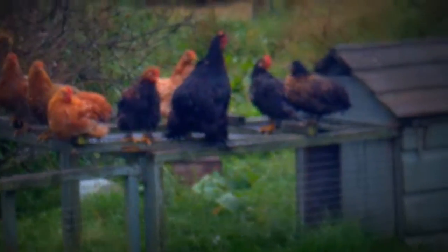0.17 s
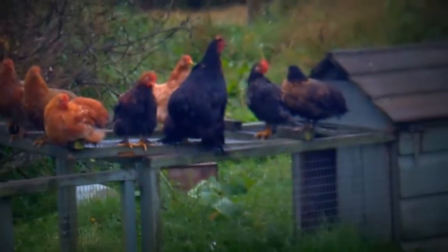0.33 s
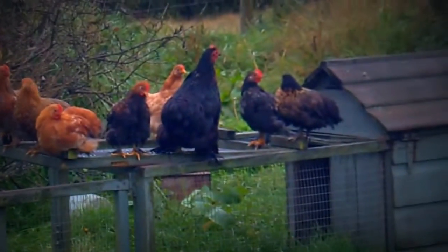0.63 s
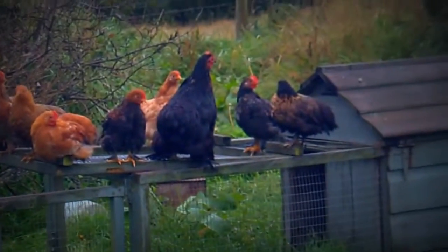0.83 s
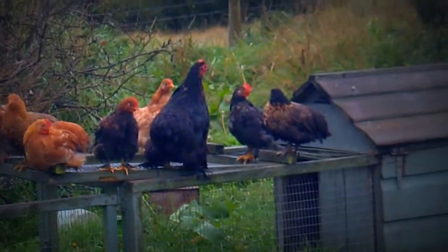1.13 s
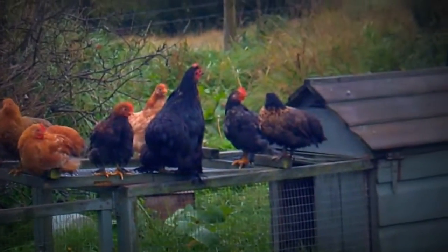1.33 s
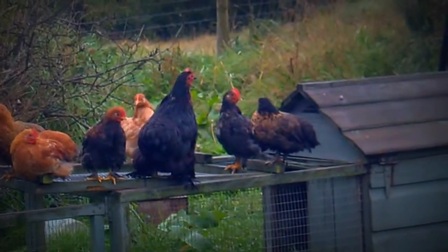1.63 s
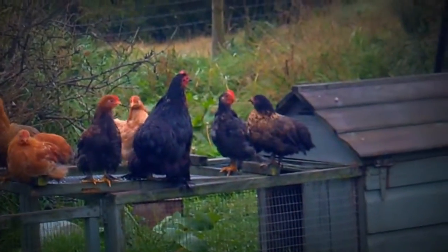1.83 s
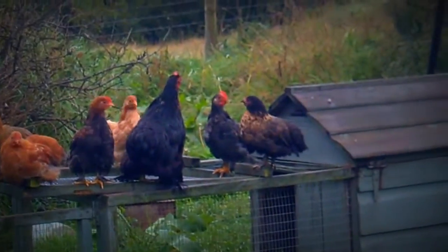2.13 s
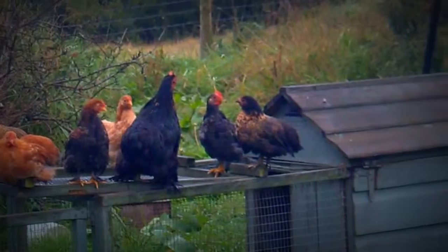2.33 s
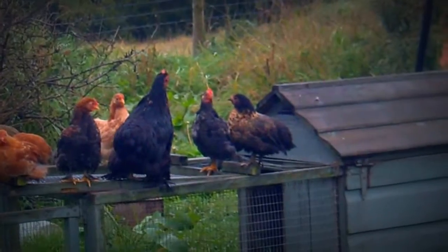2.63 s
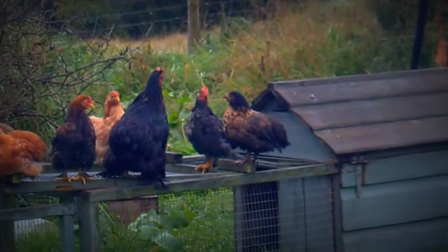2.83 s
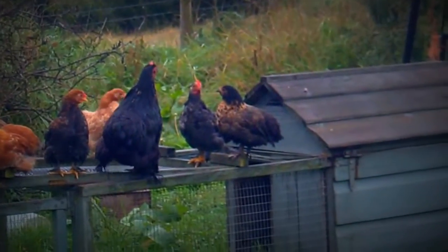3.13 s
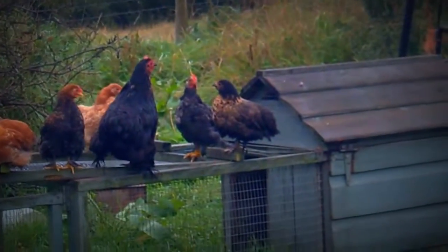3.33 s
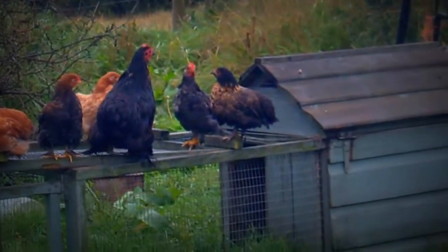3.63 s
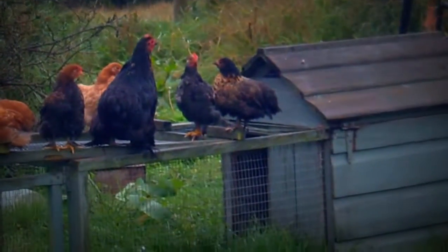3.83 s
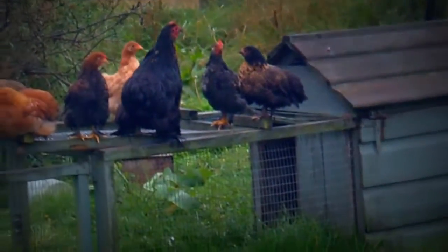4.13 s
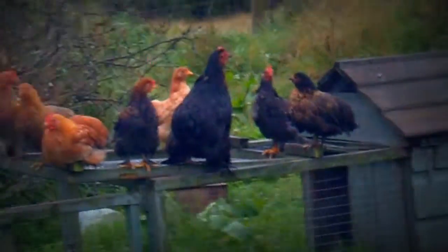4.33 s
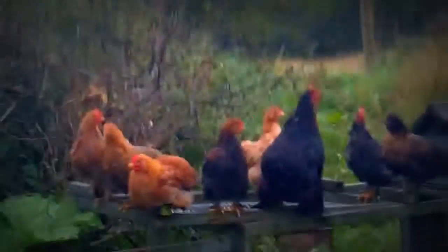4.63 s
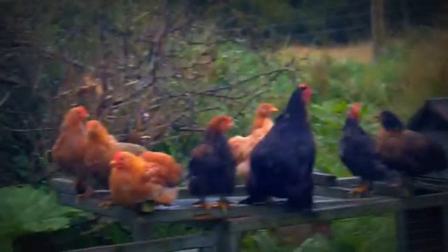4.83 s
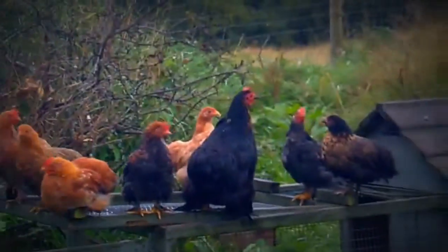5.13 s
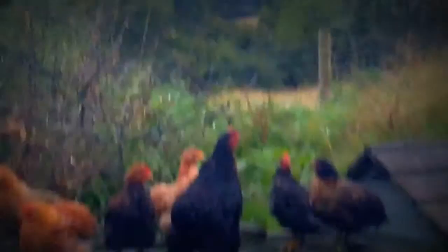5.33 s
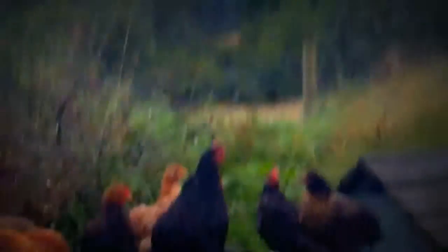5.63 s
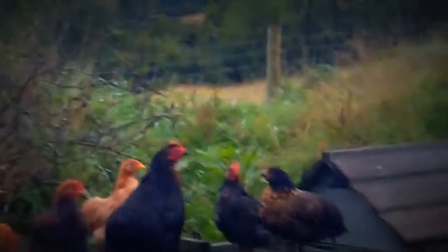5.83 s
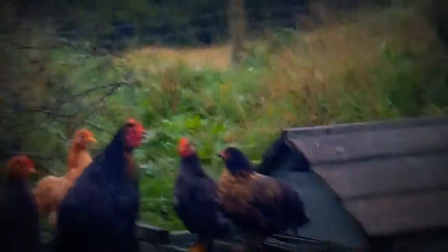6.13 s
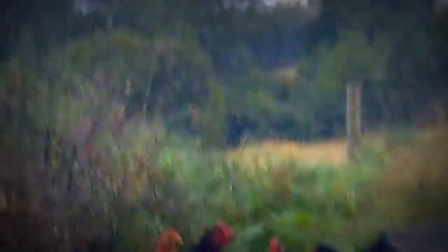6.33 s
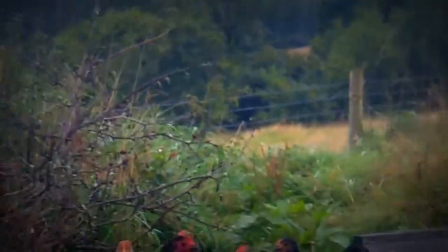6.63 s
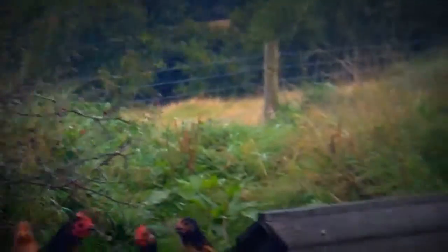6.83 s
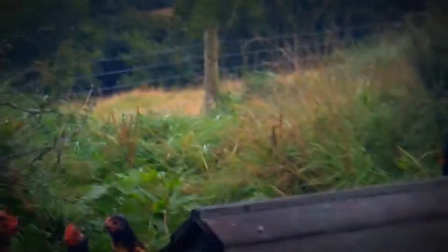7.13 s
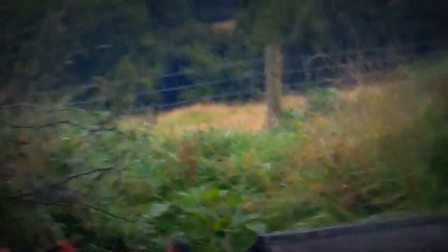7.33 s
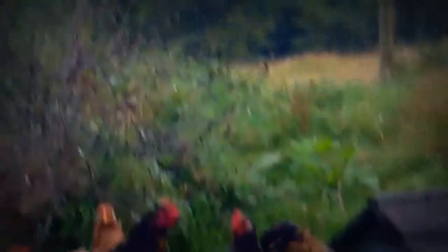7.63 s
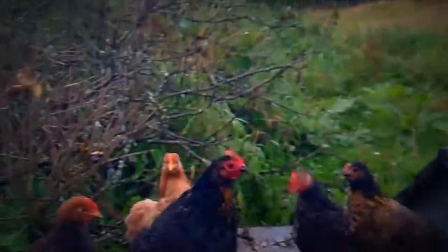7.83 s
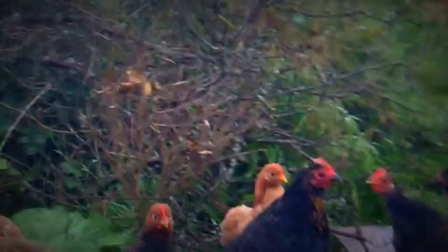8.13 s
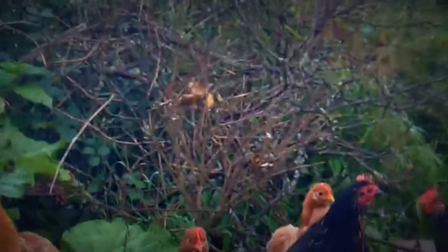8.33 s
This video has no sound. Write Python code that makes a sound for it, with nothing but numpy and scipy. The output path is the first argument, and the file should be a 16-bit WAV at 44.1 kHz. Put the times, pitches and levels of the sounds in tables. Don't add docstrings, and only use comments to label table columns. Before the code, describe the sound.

Garden hens give sharp squawks and short clucks with pauses, a small bird rattles dryly, and handling rustle grows close to a hissy microphone.

```python
import sys
import numpy as np
from scipy import signal
from scipy.fft import rfft, irfft, next_fast_len
from scipy.io import wavfile
from scipy.ndimage import uniform_filter1d

SR = 44100
rng = np.random.default_rng(int(sys.argv[2]) if len(sys.argv) > 2 else 0)


def int16_out(signal):
    q = np.round(np.clip(np.atleast_2d(signal).T, -1, 1) * 32767)
    wavfile.write(sys.argv[1], SR, q.astype(np.int16))


def gain_from_db(level_db):
    decades = np.asarray(level_db, float) / 20
    return 10 ** decades


N = 374405

# time_s, pitch_hz, effort_db, beak_opening_db
SQUAWK_CURVES = [
    [(0, 798, -37.5, 6), (.045, 899, -32.5, 0), (.09, 1009, -30.5, 5), (.165, 1017, -31, 4),
     (.2, 1017, -30.5, -1), (.217, 1166, -28.5, 5.5), (.229, 912, -33.5, 4), (.262, 760, -54, 13)],
    [(2.25, 700, -66.5, 0), (2.286, 721, -32, 1.5), (2.296, 819, -33, 2.5), (2.366, 866, -33, 1.5),
     (2.376, 925, -33.5, 5.5), (2.43, 988, -30, 6.5), (2.5, 983, -30, 4), (2.557, 933, -32.5, 5),
     (2.6, 670, -53.5, 3)],
    [(6.35, 790, -48.5, 11), (6.37, 899, -29.5, 13.5), (6.4, 931.7, -33, 21.5), (6.428, 948, -31.5, 21.5),
     (6.44, 946, -31, 17), (6.496, 981, -30, 16.5), (6.518, 1126, -26, 13.5), (6.539, 790, -30, 1),
     (6.572, 690, -64, 0)],
]
# time_s, pitch_hz, effort_db, beak_opening_db
RASP_CURVES = [
    [(1.805, 700, -69, 2.5), (1.84, 769, -46.5, 14.5), (1.865, 797, -36.5, 9), (1.9, 792, -34, 8.5),
     (1.94, 766, -42.5, 15.5), (1.958, 788, -34, 1.5), (1.992, 785, -58, 3)],
    [(6.255, 660, -62, 9), (6.28, 733.5, -46.5, 6), (6.298, 707, -28.5, 4), (6.315, 697, -28.5, -1),
     (6.327, 770, -30, 9.5), (6.34, 686.4, -29.5, 3.5), (6.355, 805, -28.5, 8), (6.375, 900, -50, 11)],
]
# pitch_hz, depth_db
GROUND_NULLS = [
    (920, 4.4),
    (925, 1.6),
    (968, 15),
]
SQUAWK_HZ = (700, 790, 862, 950, 1000, 1114)
SQUAWK_HALF_DB = (-13, -11, -21, -33, -41, -31)
SQUAWK_HOARSE_DB = (-19, -13.5, -18, -30, -31.5, -18)
# start_s, length_s, effort_db, crest_pitch_hz, beak_opening_db
ARCHED_CLUCKS = [
    (1.299, 0.12, -33.5, 841, 1.5),
    (1.609, 0.098, -33.5, 828, 1.5),
    (3.599, 0.11, -33.5, 836, 2.5),
    (3.864, .107, -33.5, 835, 3),
    (4.194, 0.11, -32.5, 851.5, 2),
]
# start_s, length_s, effort_db, crest_pitch_hz, beak_opening_db
DEEP_CLUCKS = [
    (1.048, 0.093, -34.5, 697, 4.5),
    (3.352, 0.089, -33, 694.5, 4.5),
]
# resting_pitch_hz, rise_s, pairs_even_out_at_s, half_pitch_lines_after_db, hoarseness_db
ARCHED = (655, .043, .058, -18, -20)
LEVEL = (668, .012, .04, -17, -27)
# resonance_stretch_ratio, tilt_db_per_octave, valley_near_3khz_db, extra_beak_hoarseness_db
BEAK_HOLDS = [(1.007, 6.5, 9, 4), (1, 1, -1, 7), (1.007, 1, -4, 6), (1.087, 4.5, 6, 0), (0.99, 0.5, -1, 12),
              (0.96, 2.5, 4, 14), (0.91, 3.5, 0.5, 9), (0.95, 3, 0.5, 13), (.93, 4.5, -1.5, 16),
              (0.96, 3, -1, 12), (1.01, -1, -9, 5), (1.01, -3, -12.5, 4)]
# frequency_hz, level_db
WINDPIPE = [(300, -56), (560, -43), (750, 1), (1100, 5), (1650, 9.5), (2150, -2), (2550, -18.5), (3200, -5),
            (3850, -2), (4750, 3), (5600, -13.5), (6400, -31), (8200, -32.5), (13600, -42.5)]
# start_s, peak_db, pitch_hz
RATTLE_TICKS = [(.256, -40, 4230), (.291, -33, 4300), (.323, -36, 4100), (.362, -35, 4320),
                (.392, -36.5, 4250), (.424, -35, 4200), (.458, -37, 4210), (.494, -34.5, 4260),
                (.527, -36, 4270), (.561, -40, 4240), (.594, -38, 4270), (.627, -35.5, 4120),
                (.662, -36.5, 4160)]
# start_s, length_s, from_hz, to_hz, level_db
WHISTLE_SLURS = [
    (.7, 0.062, 3680, 2910, -53.5),
    (.858, 0.069, 4800, 2910, -56.5),
    (2.83, .14, 5500, 4900, -71),
    (4.58, .1, 3830, 3800, -64),
    (5.11, .045, 5300, 4950, -62),
    (6.91, .13, 4050, 3980, -61),
    (7.57, .06, 4350, 4280, -60),
]
# start_s, peak_db, pitch_hz
FAR_PEEPS = [
    (1.805, -41, 3300),
    (4.985, -46, 4770),
    (5.04, -54, 5200),
    (5.195, -49, 5200),
    (5.32, -50, 3800),
    (5.505, -45.5, 3300),
    (5.91, -39, 4300),
    (7.585, -48, 4300),
]
# loudest_at_s, level_db, rise_20db_s, hold_s, fall_20db_s
CLOTH_RUSTLES = [
    (4.602, -61, 0.4, .01, .5),
    (4.7, -57, 0.06, .01, 1.3),
    (5.32, -60, .03, .01, 0.1),
    (5.7, -44, .04, .05, 0.15),
    (5.845, -57, 0.3, .06, 0.4),
    (6.22, -56, 0.9, .01, 0.5),
    (6.746, -51, .11, .01, .85),
    (7.146, -46.5, 0.08, 0.0084, 0.27),
    (8.02, -51, 0.24, 0.17, 0.3),
    (8.479, -49.5, 0.02, .03, .1),
]
# time_s, level_db
LEAF_BREEZE = [(0, -49.5), (.7, -61), (1.5, -60), (2.3, -67), (3.05, -65), (3.5, -71), (4.1, -62.5),
               (4.5, -69.5), (5.2, -73), (5.55, -61), (5.65, -65), (6.6, -70), (7.4, -61), (7.8, -59.5),
               (7.87, -68), (8.49, -63)]
# frequency_hz, density_db_per_hz
RUSTLE_SPECTRUM = [(150, -27), (600, -23.5), (1500, -13), (2700, -12), (3700, -7.5), (4550, 1), (5500, -11),
                   (7000, -16), (10000, -19.5), (13600, -29)]
# start_s, peak_db, pitch_hz
CASING_TICKS = [(4.6997, -33, 4300), (4.7795, -44, 4560), (4.802, -47, 4050), (4.812, -39, 4660),
                (4.8584, -36, 4330), (5.691, -34, 4600), (6.1784, -46, 4410), (6.984, -41, 4480),
                (7.1247, -36, 4770), (7.2769, -34, 4610), (8.1284, -34.5, 4360), (8.3579, -39, 4400)]
# time_s, microphone_wind_db, road_db, machine_hum_db
FAR_LEVELS = [(0, -84, -76, -87), (2.5, -88, -69, -82), (3.5, -82, -72, -74.5), (4.6, -85, -82, -77),
              (5.3, -78, -62.5, -75), (5.9, -71, -65, -80), (6.6, -73.5, -75.5, -77),
              (7.1, -82, -73, -81.5), (8.49, -84, -73, -91)]
# frequency_hz, density_db_per_hz
HISS_SPECTRUM = [(12, -34), (30, -9.5), (150, -3.5), (500, -1.5), (1200, -4.5), (3000, -9.5), (4500, -15),
                 (7000, -13.5), (9000, -15.5), (13600, -16)]

CHEST_HZ, BEAK_HZ = 1250, 2500


def shape(table, hz):
    f, db = np.transpose(table)
    return np.interp(np.log(np.maximum(hz, 1)), np.log(f), db)


def unit(x):
    return x / np.sqrt(np.mean(np.abs(x) ** 2))


def noise(table):
    size = next_fast_len(N)
    gain = gain_from_db(shape(table, np.arange(size // 2 + 1) * SR / size))
    return unit(irfft(rfft(rng.standard_normal(size)) * gain, size)[:N])


def band(x, lo_hz, hi_hz):
    return signal.sosfilt(signal.butter(2, [lo_hz, hi_hz], "bandpass", fs=SR, output="sos"), x)


def wobble(size, hz):
    k = int(SR / hz)
    rough = rng.standard_normal(size + 4 * k)
    smooth = uniform_filter1d(uniform_filter1d(rough, k), k)
    return unit(smooth)[2 * k:2 * k + size]


def columns(table):
    s, *rest = np.transpose(table)
    at = np.arange(int(s[0] * SR), min(int(s[-1] * SR), N))
    return at, [np.interp(at / SR, s, c) for c in rest]


def flock():
    out, beaks = np.zeros(N), iter(BEAK_HOLDS)
    calls = []
    nulls = GROUND_NULLS + [(1, 0)] * len(RASP_CURVES)
    for table, null in zip(SQUAWK_CURVES + RASP_CURVES, nulls):
        calls.append(squawk(table, null, next(beaks)))
    for table, kind in ((ARCHED_CLUCKS, ARCHED), (DEEP_CLUCKS, LEVEL)):
        for row in table:
            calls.append(cluck(*row, *kind, next(beaks)))
    for at, x in calls:
        out[at] += x
    return out


def squawk(table, null, beak):
    at, (hz, db, beak_db) = columns(table)
    null_hz, depth_db = null
    null_db = depth_db * np.exp(-((hz - null_hz) / 24) ** 2)
    half_db = np.interp(hz, SQUAWK_HZ, SQUAWK_HALF_DB)
    hoarse_db = np.interp(hz, SQUAWK_HZ, SQUAWK_HOARSE_DB)
    return at, voice(hz, db, beak_db, half_db, hoarse_db, beak, null_db)


def bend(u):
    return np.sin(np.pi / 2 * np.clip(u, 0, 1))


def cluck(s, length_s, db, hz, beak_db, rest_hz, rise_s, even_s, even_db, hoarse_db, beak):
    rise_from_s, fall_to_s, fall_s, sag_hz_s = .011, .022, 0.0183, 900
    attack_s, attack_db, release_s, release_db = 0.04, 37.5, 0.038, 30.5
    pairs_db, evening_s = -5, .016
    t = np.arange(int(length_s * SR)) / SR
    left = length_s - t
    crest = hz - sag_hz_s * np.maximum(t - rise_from_s - rise_s, 0)
    arch = bend((t - rise_from_s) / rise_s) * bend((left - fall_to_s) / fall_s)
    pitch = rest_hz + (crest - rest_hz) * arch
    swelling = np.maximum(1 - t / attack_s, 0)
    fading = np.maximum(1 - left / release_s, 0)
    effort = db - attack_db * swelling ** 2 - release_db * fading ** 1.55
    half_db = np.interp(t - even_s, (-evening_s / 2, evening_s / 2), (pairs_db, even_db))
    opening_db = beak_db + 3.5 * bend(2 * fading)
    at = int(s * SR) + np.arange(len(t))
    return at, voice(pitch, effort, opening_db, half_db, hoarse_db, beak)


def voice(hz, db, beak_db, half_db, hoarse_db, beak, null_db=0):
    weak = np.maximum(np.max(db) - db - 4, 0)
    starting = np.arange(len(db)) < np.argmax(db)
    chesty = np.where(starting, 1.73, 0.28) * weak
    slope = uniform_filter1d(np.gradient(hz), size=300) * SR
    jump = np.maximum(slope / 16200, -slope / 10900)
    crack = 13 * np.minimum(jump, 1) ** 2
    chest_db = np.minimum(26 * np.log2(np.minimum(hz / 1021, 1)) + chesty, 6)
    half_db = np.minimum(half_db + weak + crack, 3)
    hoarse_db = np.minimum(hoarse_db + weak + crack, 3)
    return hen(hz, db - null_db, chest_db + null_db, beak_db + null_db, half_db, hoarse_db, beak)


def hen(hz, db, chest_db, beak_db, half_db, hoarse_db, beak):
    jitter, tremble, flutter_db, hoarse_hz, spread = 0.0072, 0.0054, 2.5, 480, 0.33
    size = len(hz)
    stretch, tilt_db, valley_db, rasp_db = beak
    unsteady = jitter * gain_from_db(np.minimum(hoarse_db, 0)) * wobble(size, 400) + tremble * wobble(size, 95)
    turn = np.cumsum(np.pi * hz * (1 + unsteady) / SR)
    k = np.arange(1, 40)[:, None]
    odd = k % 2
    line_hz = k * hz / 2
    throat_db = shape(WINDPIPE, line_hz / np.interp(line_hz, [CHEST_HZ, BEAK_HZ], [1, stretch]))
    throat_db += tilt_db * np.log2(np.clip(line_hz, BEAK_HZ, 7000) / 4500)
    throat_db += valley_db * np.exp(-((line_hz - 3000) / 500) ** 2)
    flutter = np.array([wobble(size, 67) for _ in k])
    gain = gain_from_db(throat_db + odd * half_db + flutter_db * flutter) * (line_hz < 13800)
    wave = gain * np.exp(1j * (k * turn - spread * (line_hz / 1000) ** 2))
    smear = np.array([wobble(size, hoarse_hz) + 1j * wobble(size, hoarse_hz) for _ in k]) / np.sqrt(2)
    between = gain_from_db(odd * np.clip(-half_db - 2.5, 0, 40))
    parts = ((0, CHEST_HZ, chest_db, 0), (CHEST_HZ, BEAK_HZ, 0, 0), (BEAK_HZ, 6500, beak_db, rasp_db))
    out = 0
    for lo, hi, part_db, extra_db in parts:
        above = np.clip((line_hz - lo) / 100 + .5, 0, 1)
        inside = above * np.clip((hi - line_hz) / 100 + .5, 0, 1)
        norm = np.sqrt(np.sum((gain * inside) ** 2, axis=0) / 2) + 1e-9
        hoarse = gain_from_db(np.minimum(hoarse_db + extra_db, 6))
        share = above if lo == BEAK_HZ else inside
        lines = np.sum(wave * share * (1 + hoarse * between * smear), axis=0)
        out = out + gain_from_db(part_db) * lines / norm / np.sqrt(1 + 1.5 * hoarse ** 2)
    edge = np.minimum(np.arange(size)[::-1] / 200, 1)
    return -out.real * edge * gain_from_db(db)


def puff(t, length_s):
    u = np.clip(t, 0, 1) / length_s
    return u * np.exp(1 - u)


def bursts(table, length_s, width_hz, double_s, second):
    out = np.zeros(N + SR)
    t = np.arange(int(.08 * SR)) / SR
    swell = puff(t, length_s) + second * puff(t - double_s, length_s)
    for s, db, hz in table:
        breath = band(rng.standard_normal(len(t)), max(hz - width_hz, 200), hz + width_hz)
        x = (unit(breath) + np.sin(2 * np.pi * hz * t)) * swell
        start = int(s * SR)
        out[start:start + len(t)] += gain_from_db(db) * x / np.max(np.abs(x))
    return out[:N]


def rattle():
    return bursts(RATTLE_TICKS, length_s=0.0014, width_hz=504, double_s=0.0073, second=1.7)


def whistles():
    out = np.zeros(N)
    for s, length_s, from_hz, to_hz, db in WHISTLE_SLURS:
        u = np.linspace(0, 1, int(length_s * SR))
        hz = to_hz + (from_hz - to_hz) * (1 - u) ** 2.2
        gain = gain_from_db(db - 10 * (2 * u - 1) ** 2 + 4.2 * wobble(len(u), 310))
        start = int(s * SR)
        out[start:start + len(u)] += np.sqrt(2) * gain * np.sin(np.cumsum(2 * np.pi * hz / SR))
    return out


def peeps():
    return bursts(FAR_PEEPS, length_s=0.0057, width_hz=320, double_s=0.0154, second=0.48)


def garden(x):
    t60_s, scatter_db, gap_s = 0.41, -20, 0.0073
    fence_s, fence_smear_s, fence_gain = 0.14, 0.0042, 1.3
    t = np.arange(int(.8 * SR)) / SR
    fence = 1 + fence_gain * np.exp(-((t - fence_s) / fence_smear_s) ** 2)
    decay = np.exp(-np.log(1000) * t / t60_s) * np.clip(t / gap_s - 1, 0, 1)
    tail = unit(rng.standard_normal(len(t)) * fence * decay)
    return x + gain_from_db(scatter_db) * signal.fftconvolve(x, tail / np.sqrt(len(t)))[:N]


def rustle():
    t = np.arange(N) / SR
    power = gain_from_db(np.interp(t, *np.transpose(LEAF_BREEZE))) ** 2
    for s, db, rise_s, hold_s, fall_s in CLOTH_RUSTLES:
        before = np.maximum((s - t) / rise_s, 0)
        after = np.maximum((t - s - hold_s) / fall_s, 0)
        power = power + gain_from_db(db - 20 * before - 20 * after) ** 2
    x = noise(RUSTLE_SPECTRUM)
    x = x / np.std(band(x, 3500, 5500))
    body = signal.sosfilt(signal.butter(2, 3000, fs=SR, output="sos"), x)
    grains = gain_from_db(1.73 * wobble(N, 62) + 0.79 * wobble(N, 900))
    return np.sqrt(power) * unit(grains) * (x + (gain_from_db(1.1) - 1) * body)


def ticks():
    return bursts(CASING_TICKS, length_s=0.00056, width_hz=1600, double_s=0.0019, second=0.32)


def distance():
    at, (wind_db, road_db, hum_db) = columns(FAR_LEVELS)
    size = len(at)
    wind = unit(band(rng.standard_normal(size), 16, 60)) * gain_from_db(wind_db + 2.4 * wobble(size, 6.5))
    road = unit(band(rng.standard_normal(size), 310, 900)) * gain_from_db(road_db)
    hum = np.sqrt(2) * np.sin(2 * np.pi * 136.4 * at / SR) * gain_from_db(hum_db + 2.3 * wobble(size, 6.5))
    return np.pad(wind + road + hum, (0, N - size))


def hiss():
    return gain_from_db(-58) * noise(HISS_SPECTRUM)


def whine():
    whine_hz, whine_db, flip_s, first_flip_s = 7689.7, -52, .0341335, .0317
    t = np.arange(N) / SR
    flips = np.clip(np.sin(np.pi * (t - first_flip_s) / flip_s) * 45, -1, 1)
    return np.sqrt(2) * gain_from_db(whine_db) * flips * np.sin(2 * np.pi * whine_hz * t)


def scene():
    birds = flock() + rattle() + whistles() + peeps()
    near = rustle() + ticks()
    return (garden(birds) + near + distance() + hiss() + whine())[None]


def top_cut(x):
    return signal.sosfilt(signal.butter(12, 13900, fs=SR, output="sos"), x)


def record(dry):
    return top_cut(dry)


dry = scene()
out = record(dry)
int16_out(out)
```